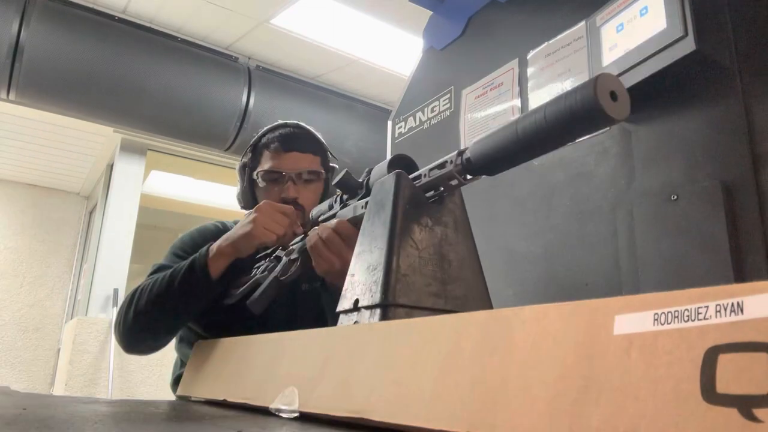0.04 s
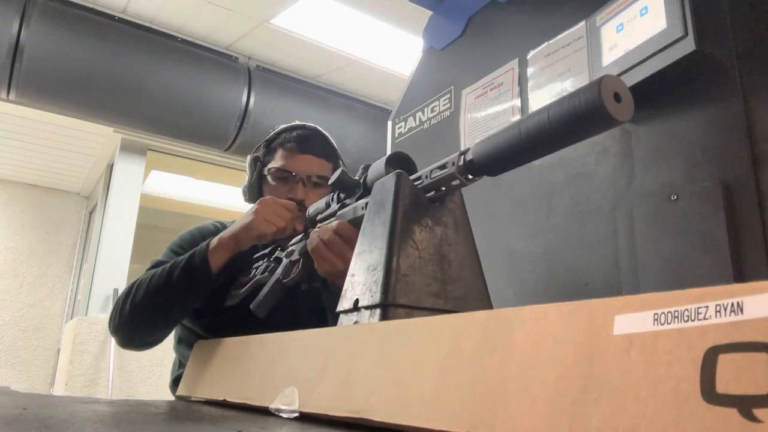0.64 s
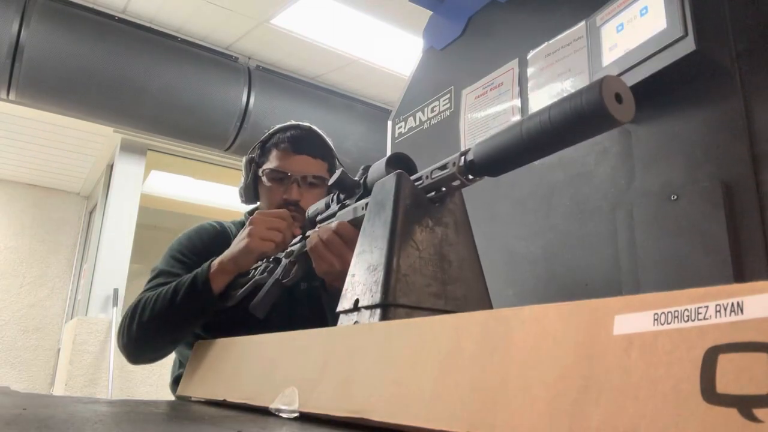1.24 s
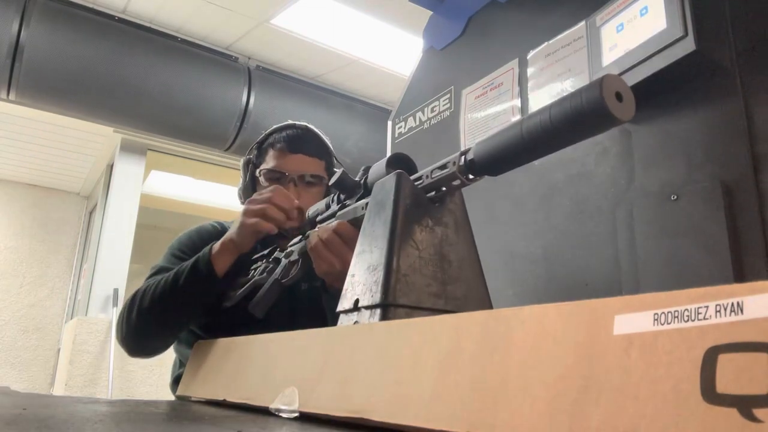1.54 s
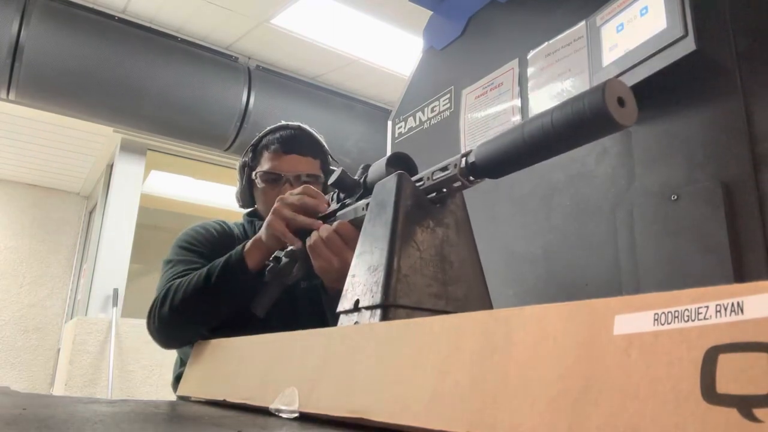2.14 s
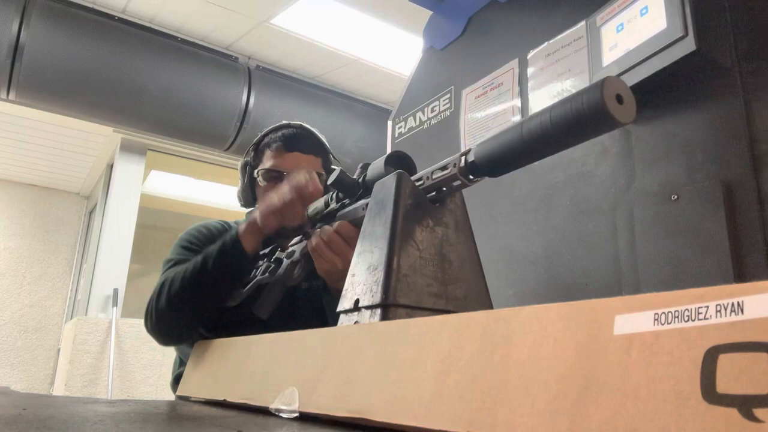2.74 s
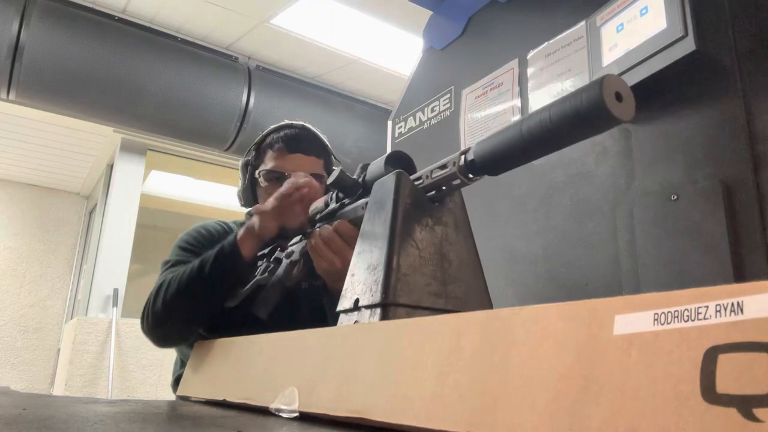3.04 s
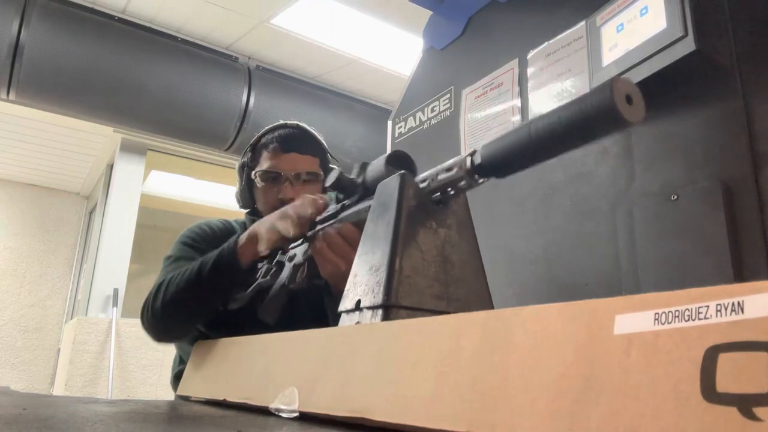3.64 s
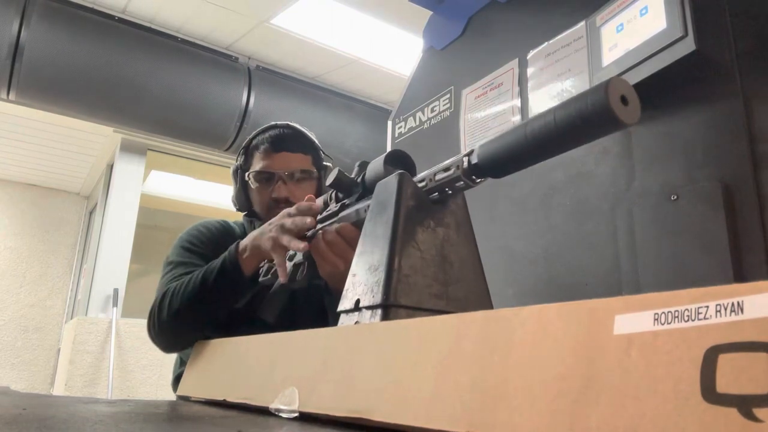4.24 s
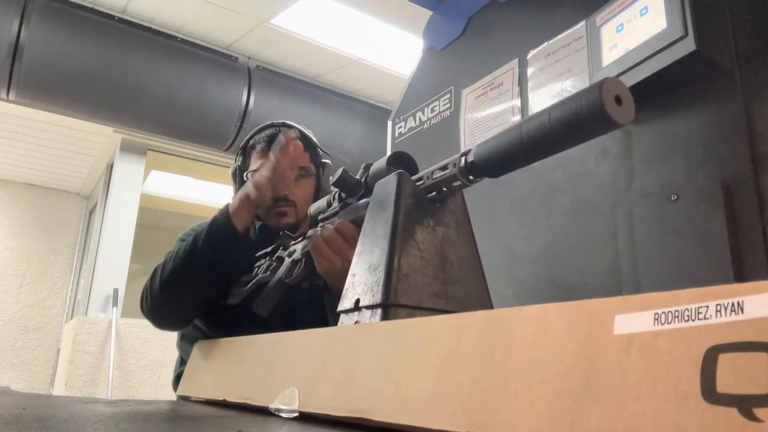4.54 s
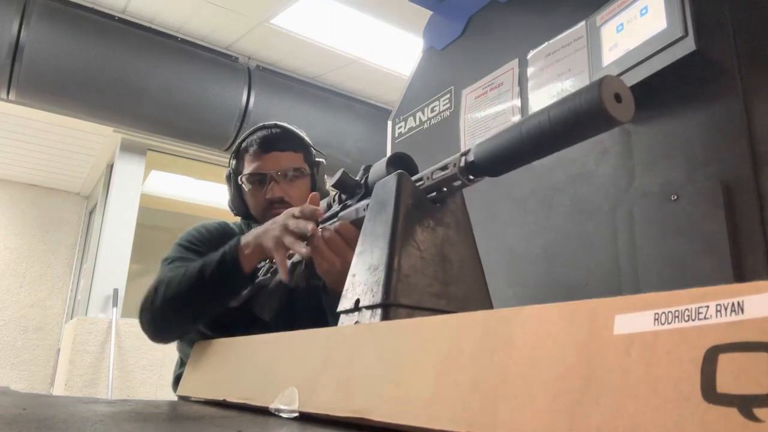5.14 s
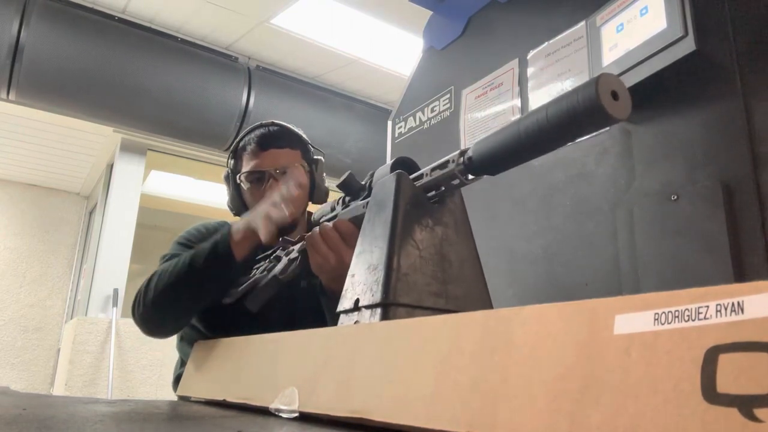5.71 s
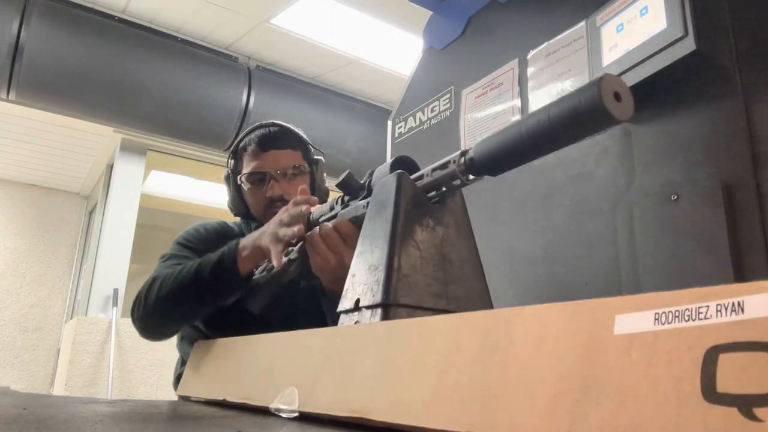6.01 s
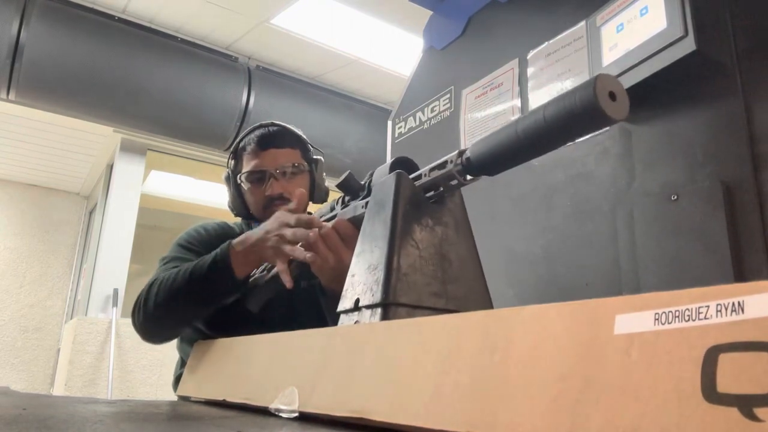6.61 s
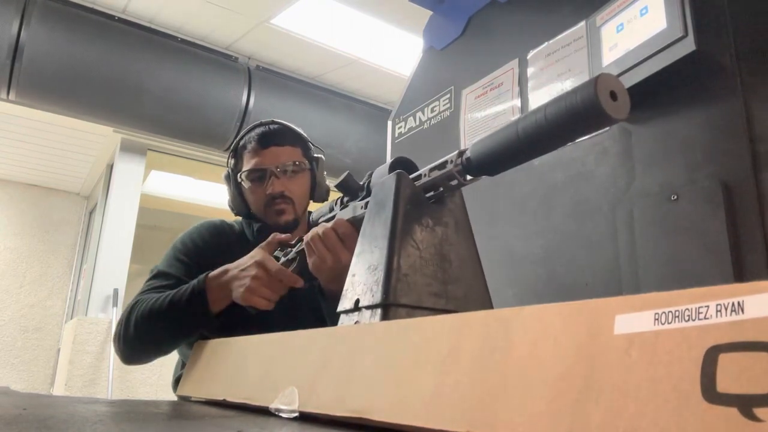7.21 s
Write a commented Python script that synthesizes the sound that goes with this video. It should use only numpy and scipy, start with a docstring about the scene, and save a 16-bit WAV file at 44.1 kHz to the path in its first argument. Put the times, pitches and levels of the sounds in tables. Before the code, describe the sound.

Sharp little metal clicks come from a handled rifle over the constant booming rush of air in a shooting range's ducts.

```python
"""A steady, booming roar fills an indoor shooting range: air rushing through the ventilation ducts.
The vents hiss, and a thin whistle wanders from pitch to pitch.
In a booth, close to the microphone, someone handles a rifle: a sleeve brushes the stock and
something squeaks once. The metal parts knock together and ring in sharp clicks, which bounce
off the booth walls and fade in the range."""
import sys
import numpy as np
from scipy import signal
from scipy.fft import rfft, irfft, next_fast_len
from scipy.io import wavfile
from scipy.ndimage import uniform_filter1d

SR = 44100
rng = np.random.default_rng(int(sys.argv[2]) if len(sys.argv) > 2 else 0)


def waveform_to_disk(signal):
    """Save audio, clipped to [-1, 1], as 16-bit WAV at the path in sys.argv[1]."""
    frames = np.transpose(np.atleast_2d(signal))
    scaled = np.clip(frames, -1, 1) * 32767
    samples = np.round(scaled).astype(np.int16)
    wavfile.write(sys.argv[1], SR, samples)


N = 320607


def from_db(db):
    """Turn decibels into a number to multiply a sound by."""
    return 10 ** (np.asarray(db) / 20)


def unit_level(x):
    """Scale a sound so its mid (first row) has an average level (rms) of 1."""
    return x / np.sqrt(np.mean(x[0] ** 2) + 1e-20)


def in_time(rows):
    """Join (time, value) points with straight lines, one value per sample."""
    return np.interp(np.arange(N) / SR, *np.transpose(rows))


def frequencies(size):
    """The frequencies in the spectrum of a sound with this many samples."""
    return np.maximum(np.fft.rfftfreq(size, 1 / SR), 1)


def at_hz(points, hz):
    """Read between (frequency, value) points, with octaves evenly spaced."""
    knots, values = np.transpose(points)
    return np.interp(np.log(hz), np.log(knots), values)


def noise(colour, size, peaks=()):
    """Two rows of coloured noise: mid (what left and right share) and side (how they differ)."""
    padded = next_fast_len(size)
    hz = frequencies(padded)
    level = at_hz(colour, hz)
    for centre, width, peak_db in peaks:
        level = level + peak_db / (1 + (2 * (hz - centre) / width) ** 2)
    white = rfft(rng.standard_normal((2, padded)))
    return unit_level(irfft(white * from_db(level), padded)[:, :size])


def drift(rate_hz):
    """A smooth random wobble, about 1 in size; a higher rate makes it quicker."""
    size = next_fast_len(N)
    white = rfft(rng.standard_normal(size))
    slow = irfft(white / (1 + (frequencies(size) / rate_hz) ** 2), size)[:N]
    return slow / slow.std()


def resonate(x, hz, width):
    """Let a sound ring at one pitch; a narrower width rings longer."""
    r = np.exp(-np.pi * width / SR)
    feedback = [1, -2 * r * np.cos(2 * np.pi * hz / SR), r * r]
    return signal.lfilter(np.array([1, 0, -1]) * (1 - r * r) / 2, feedback, x)


def swells(rows):
    """Bell-shaped bumps from (time, half length, height) rows."""
    t = np.arange(N) / SR
    return sum(height * np.exp(-((t - s) / half) ** 2) for s, half, height in rows)


def tones(rows, waver_hz):
    """Pure tones that swell and fade, all sharing one wobble in pitch."""
    t = np.arange(N) / SR
    bend = np.cumsum(waver_hz) / SR
    out = np.zeros((2, N))
    for s, half, hz, db in rows:
        near = np.abs(t - s) < np.pi * half
        phase = 2 * np.pi * (hz * t[near] + bend[near] + rng.random())
        swell = np.sqrt(2) * from_db(db) * np.exp(-((t[near] - s) / half) ** 2)
        out[:, near] += swell * np.array([np.sin(phase), np.cos(phase)])
    return out


def steadied(x, span_s=0.27):
    """Even out the slow ups and downs in a noise's loudness."""
    power = np.mean(x[0] ** 2)
    return x * np.sqrt(power / (uniform_filter1d(x[0] ** 2, int(span_s * SR)) + 1e-12))


# Colour of the rushing air, from bass to treble (frequency [Hz], relative level [dB])
ROAR_COLOUR = [(22, -38), (32, -13), (41, -5.5), (60, -0.5), (85, -4.5), (170, -0.14), (205, -3.5),
               (290, -5.5), (370, -10.5), (520, -12), (630, -13.5), (950, -13), (1300, -18), (1650, -27),
               (2600, -73)]
# Pitches at which the ducts ring (pitch [Hz], width [Hz], boost [dB])
DUCT_RINGS = [(61, 9.1, 9.5), (128.7, 7.4, 4.5), (154, 4.7, 2), (225, 4.7, 3.5), (255.6, 9.4, 6),
              (420, 2.5, 3), (457.7, 37, 7), (518, 6.1, 7.5), (562, 47, 5.5), (726.5, 28, 6), (920, 16, 4),
              (1340, 8.1, 5)]
# How the deepest rumble rises and falls (time [s], level change [dB])
RUMBLE_CURVE = [(0, -1), (.7, -2), (1.1, -2.5), (1.3, 0), (2.55, 0.5), (2.85, -1), (3.25, 1), (3.55, 3.5),
                (4.0, -0.5), (5.1, 1), (5.65, -3.5), (5.87, 3.5), (6.15, -4.5), (6.45, 4), (6.7, 0),
                (7.27, 1)]
# How the low roar just above it rises and falls (time [s], level change [dB])
THROB_CURVE = [(0, -0.5), (.8, -0.5), (1.25, -0.9), (2.0, 0.5), (2.47, -2.8), (2.95, 2.3), (3.3, -0.5),
               (3.7, 0.5), (4.03, 0), (4.23, -2.3), (4.5, 0), (5.2, -1), (5.9, 0.9), (6.5, 1.2),
               (6.92, -0.5), (7.27, 0.5)]
def ducts(level_db=-24.5, rumble_hz=105, throb_hz=300):
    """Swirling air roars through the ringing ducts; its low notes swell and sink."""
    air = from_db(level_db) * noise(ROAR_COLOUR, N, DUCT_RINGS)
    deep = signal.sosfiltfilt(signal.butter(4, rumble_hz, fs=SR, output="sos"), air)
    low = signal.sosfiltfilt(signal.butter(4, throb_hz, fs=SR, output="sos"), air)
    rumble = from_db(in_time(RUMBLE_CURVE)) * steadied(deep)
    throb = from_db(in_time(THROB_CURVE)) * steadied(low - deep)
    return air - low + rumble + throb


# Moments when a duct booms (time [s], half length [s], pitch [Hz], level [dB])
BOOM_TONES = [(.2, 0.35, 256, -36), (.83, 0.2, 153.9, -30), (1.2, .2, 129, -40), (1.8, 0.23, 257, -36.5),
              (2.03, 0.11, 154, -35), (2.15, 0.11, 129.6, -31.5), (2.27, 0.2, 225.1, -34.5),
              (2.9, 0.22, 155, -37), (2.8, 0.25, 256.8, -33), (3.22, 0.13, 256.7, -29),
              (3.3, 0.13, 221, -31.5), (3.62, 0.4, 154.6, -33), (3.63, 0.05, 257, -30.5),
              (4.0, .1, 160.5, -31), (4.4, 0.12, 221.6, -33.5), (4.5, 0.082, 257, -31),
              (4.8, 0.25, 155, -34.5), (4.95, 0.11, 256.5, -31), (5.62, 0.25, 257, -35),
              (6.15, 0.28, 155.3, -30.5), (6.25, 0.34, 224, -36.5), (6.7, 0.08, 154.7, -36)]
def duct_booms(waver_hz=1):
    """The ducts' low notes take turns booming as clear tones, so the roar throbs."""
    return tones(BOOM_TONES, waver_hz * drift(2.5))


# Colour of the hiss at the vents (frequency [Hz], relative level [dB])
HISS_COLOUR = [(1000, -6), (1800, 2.5), (2600, 1), (3500, -4.5), (4300, -10), (5100, -11), (7500, -24),
               (8700, -35.5), (10000, -31), (12200, -23), (16000, -47)]
def vents(level_db=-44.5, flutter_db=0.8):
    """Air hisses smoothly as it leaves the grilles."""
    return from_db(level_db + flutter_db * drift(15)) * noise(HISS_COLOUR, N)


# Moments when the whistle turns clear (time [s], half length [s], pitch [Hz], level [dB])
WHISTLE_TONES = [(.07, .07, 4672, -60), (.5, .09, 4642, -57), (.74, .06, 4582, -59),
                 (1.0, 0.13, 4752, -56.5), (1.13, .05, 4580, -60), (1.39, 0.089, 4720, -59),
                 (1.91, 0.061, 4592, -54), (2.11, .09, 4568, -58), (2.29, .06, 4560, -57.5),
                 (2.78, .07, 4580, -57), (2.82, 0.14, 4630, -64), (3.55, .06, 4600, -61),
                 (3.78, 0.087, 4550, -58), (4.25, 0.1, 4730, -53.5), (4.43, 0.066, 4672, -55),
                 (4.6, .1, 4714, -64), (5.13, 0.12, 4690, -55), (5.28, 0.068, 4612, -59),
                 (5.67, .07, 4690, -58), (5.91, .05, 4720, -58), (6.58, 0.062, 4563, -56),
                 (6.73, 0.079, 4607, -64), (7.24, 0.043, 4725, -60)]
# Its breathy part dips under some higher tones (time [s], half length [s], level change [dB])
WHISTLE_DIPS = [(1.0, .13, -1), (1.36, .1, -5), (4.35, .25, -6)]
def whistle(pitch_hz=4610, width_hz=100, level_db=-60, waver_hz=11):
    """The air's faint, breathy whistle flares into clear tones that hop between nearby pitches."""
    breathy = rng.standard_normal((2, N))
    for _ in range(2):
        breathy = resonate(breathy, pitch_hz, width_hz)
    breathy = from_db(level_db + swells(WHISTLE_DIPS)) * unit_level(breathy)
    return breathy + tones(WHISTLE_TONES, waver_hz * drift(30))


# Colour of the range's echo (frequency [Hz], relative level [dB])
RANGE_COLOUR = [(300, -11), (1400, -15), (3000, 4), (5000, 2), (7500, -4), (10000, -8.5), (12300, 1),
                (15500, -11)]
def range_echo(x, fade_s=0.32, level_db=-19.5, build_s=0.0058):
    """The big room smears each click into a smooth tail that drops 60 dB in fade_s."""
    t = np.arange(SR) / SR
    build = 1 - np.exp(-(t / build_s) ** 2)
    tail = (from_db(-60 * t / fade_s) * build) ** 2
    energy = signal.fftconvolve(x[0] ** 2, tail / tail.sum())[:N]
    return from_db(level_db) * np.sqrt(np.abs(energy)) * noise(RANGE_COLOUR, N)


def booth_echo(x, fade_s=0.081, level_db=-5, dull_hz=11000, build_s=0.0018):
    """The close booth walls throw back many quick echoes, a little duller than the click."""
    t = np.arange(SR // 2) / SR
    build = 1 - np.exp(-(t / build_s) ** 2)
    spectrum = rfft(rng.standard_normal((2, len(t))) * from_db(-60 * t / fade_s) * build, SR)
    even = irfft(spectrum / np.abs(spectrum), SR)[:, :len(t)]  # every frequency equally strong
    bounces = even * build * from_db(-20 * t / fade_s)
    bounces /= np.linalg.norm(bounces[0])
    dull = signal.butter(1, dull_hz, fs=SR, output="sos")
    return from_db(level_db) * signal.sosfilt(dull, signal.fftconvolve(x, bounces, axes=1)[:, :N])


# Strokes of the sleeve (time [s], half length [s], level [dB])
SLEEVE_STROKES = [(1.023, .06, -66), (1.157, 0.093, -54.5), (1.74, 0.052, -59), (1.96, 0.03, -71),
                  (4.45, .04, -65)]
# Colour of rubbing cloth (frequency [Hz], relative level [dB])
CLOTH_COLOUR = [(2000, 7), (6000, 6), (8500, -15), (11500, 6), (14000, 1), (16000, -6)]
def sleeve(grain_db=1.5):
    """Cloth slides over the rifle's stock in short, grainy strokes."""
    strokes = swells([(s, half, from_db(db)) for s, half, db in SLEEVE_STROKES])
    return strokes * from_db(grain_db * drift(70)) * noise(CLOTH_COLOUR, N)


# The tones that make up the squeak (time [s], half length [s], pitch [Hz], level [dB])
SQUEAK_TONES = [(5.293, 0.021, 12200, -56), (5.334, .012, 12290, -63), (5.315, 0.037, 11490, -66)]
def squeak(waver_hz=25):
    """Something gives one tiny, high squeak under the hand."""
    return tones(SQUEAK_TONES, waver_hz * drift(80))


# Colour of metal hitting metal (frequency [Hz], relative level [dB])
METAL_COLOUR = [(200, -10), (800, 10.5), (1500, 2), (2200, 0.5), (4000, 3), (5800, 2.5), (7500, -7),
                (10000, -4), (12000, 2), (14500, 2), (15700, 0)]
# Pitches at which the rifle rings (pitch [Hz], width [Hz], relative level [dB])
RIFLE_RINGS = [(1310, 140, 4.5), (1930, 91, -7), (3530, 71, -27), (3700, 93, -18), (12100, 500, -14),
               (14000, 550, -19)]
# One row per click; the levels after the strength are relative to it
# (time [s], strength [dB], rattle fade [s], low knock [dB], body [dB], high snap [dB],
#  ping pitch [Hz], ping level [dB], clank pitch [Hz], clank level [dB])
RIFLE_CLICKS = [ (0.1428, -24.5, .0016, -1, -7, 7, 5130, -8, 2850, -5),
                (0.153, -21, 0.0032, -2, -1.5, 0, 5430, -7, 2830, 2),
                (0.6952, -35.5, .003, -6, 3, -6, 5000, -2, 2850, -7),
                (0.83, -38, .0018, -7, -1, 1, 5000, -5, 2850, -3),
                (.853, -21.5, 0.0018, 4, -2, 3, 5130, 7, 1950, -1),
                (0.8565, -14.5, 0.002, 0.5, -5, 4, 5700, -2, 3900, -7),
                (1.424, -46, .0015, -7, -3, 3, 5000, -4, 2850, -3),
                (1.938, -55, .0019, -7, -4, 4, 5000, -5, 2850, -3),
                (2.939, -21.5, 0.0014, -0.5, -1.5, 1, 5150, 1, 2680, 4),
                (3.236, -17, 0.0008, -1, 0.5, 3, 5000, -20, 2080, 4),
                (3.596, -20.5, 0.0034, 5.5, 1.5, 4, 5000, 5, 1420, 5.5),
                (3.958, -23, 0.0045, -3, -1, -3, 4930, -1, 2050, -7),
                (3.965, -27, 0.0015, -9, 4, -.5, 4870, 1, 2870, 6),
                (4.418, -51, .003, -7, -6, 6, 4960, -5, 2850, -3),
                (4.638, -23.5, 0.0028, -5, 0, -2.5, 5030, 0, 2890, 4),
                (5.4405, -26.5, 0.0055, 0.5, 0.5, -2, 5030, -8, 2760, -2),
                (5.8334, -34, .007, -3, 2, -3, 4950, -7, 2850, 1),
                (6.2472, -18.5, 0.0028, 5.5, 4, -1, 4930, 7, 2980, 4)]
def rifle(level_db=-4, rise_s=0.0023, grain_db=2,
          knock_hz=1300, body_hz=2700, ring_hz=5800, snap_hz=12500,
          ping_lift_db=4, ping_width_hz=107, clank_width_hz=320):
    """Each click is a split-second rattle of metal on metal that sets the rifle ringing."""
    t = np.arange(SR // 10) / SR
    out = np.zeros((2, N + len(t)))
    onset = 1 - np.exp(-(t / rise_s) ** 2)
    for (time_s, blow_db, fade_s, knock_db, body_db, snap_db,
         ping_hz, ping_db, clank_hz, clank_db) in RIFLE_CLICKS:
        hardness = [(knock_hz, knock_db), (body_hz, body_db), (ring_hz, 0), (snap_hz, snap_db)]
        colour = [(hz, db + at_hz(hardness, hz)) for hz, db in METAL_COLOUR]
        strength = from_db(blow_db) * np.linalg.norm(from_db([body_db, 0, snap_db]))
        shape = onset * np.exp(-t / fade_s)
        shape /= shape.max()
        # the parts chatter unevenly while they settle
        chatter = uniform_filter1d(rng.standard_normal(len(t)), size=24)
        rattle = shape * from_db(grain_db * chatter / chatter.std())
        rattle *= np.linalg.norm(shape) / np.linalg.norm(rattle)  # chatter adds no energy
        contact = strength * rattle * noise(colour, len(t))
        # how much the metal pings and clanks depends on where the blow lands
        swing = np.sin(2 * np.pi * (ping_hz * t + rng.random((2, 1))))
        ping_fade = np.exp(-np.pi * ping_width_hz * t)
        ping = from_db(blow_db + ping_db + ping_lift_db) * onset * swing * ping_fade
        rings = [(clank_hz, clank_width_hz, clank_db), *RIFLE_RINGS]
        ringing = sum(from_db(db) * resonate(contact, hz, width) for hz, width, db in rings)
        start = round(time_s * SR)
        out[:, start:start + len(t)] += contact + ping + ringing
    return from_db(level_db) * out[:, :N]


# How wide the sound spreads (frequency [Hz], side level change [dB])
STEREO_WIDTH = [(30, -27), (60, -35), (90, -8.5), (160, -19.5), (260, -5), (460, -1.5), (650, 4),
                (820, 2.5), (1100, -2), (1400, -2.5), (1960, 2.5), (3000, -2), (5000, -0.5), (6300, 2.5),
                (8000, 11.5), (10000, 3), (12000, -11.5), (14000, -21)]
# How far it leans to the left (frequency [Hz], left minus right [dB])
LEFT_LEAN = [(60, 0.0), (150, 0.0), (380, 0), (950, 2), (2380, 1.4), (5980, 1.1), (15000, 0.45)]
def microphone(mid_side):
    """Two openings hear left and right: alike in the bass and at the top, the left a bit louder."""
    size = next_fast_len(N)
    hz = frequencies(size)
    mid, side = rfft(mid_side, size)
    side = side * from_db(at_hz(STEREO_WIDTH, hz))
    lean = from_db(at_hz(LEFT_LEAN, hz) / 2)
    return irfft(np.array([(mid + side) * lean, (mid - side) / lean]), size)[:, :N]


def scene(click_side_db=-2.5):
    """Air roars all around; the clicks come from the front and echo in the booth and the range."""
    clicks = rifle() * from_db([[0], [click_side_db]])
    booth = booth_echo(clicks)
    ventilation = ducts() + duct_booms() + vents() + whistle()
    return microphone(ventilation + clicks + booth + range_echo(clicks) + sleeve() + squeak())


def record(dry, bass_cut_hz=34, treble_cut_hz=15750):
    """The deepest bass and the highest treble are cut away steeply."""
    dry = signal.sosfilt(signal.butter(6, bass_cut_hz, "high", fs=SR, output="sos"), dry)
    return signal.sosfilt(signal.ellip(12, .1, 90, treble_cut_hz, fs=SR, output="sos"), dry)


dry = scene()
out = record(dry)
waveform_to_disk(out)
```